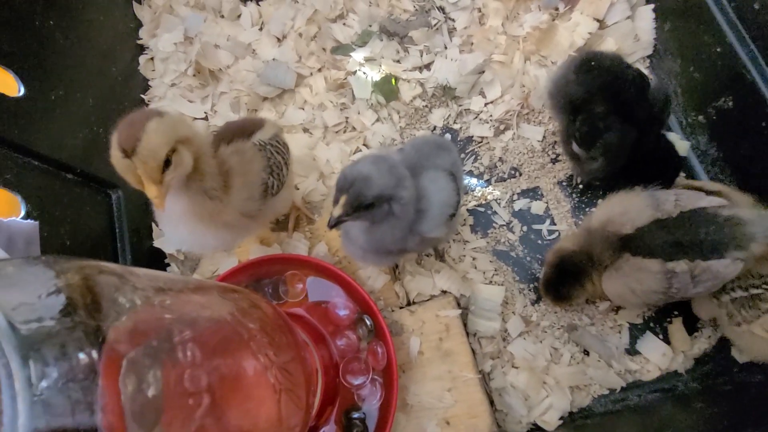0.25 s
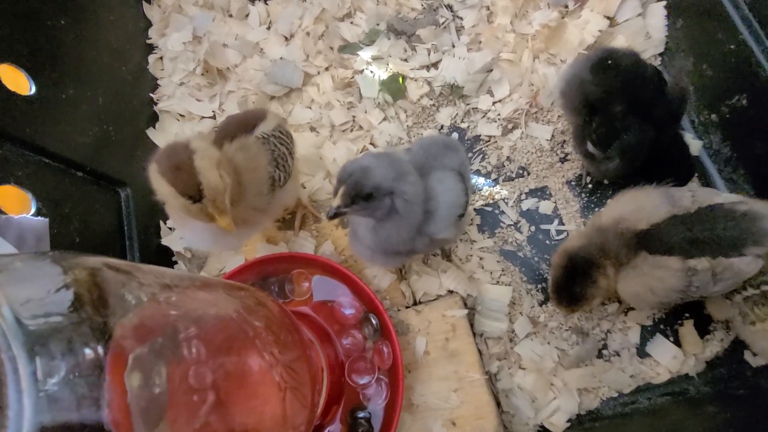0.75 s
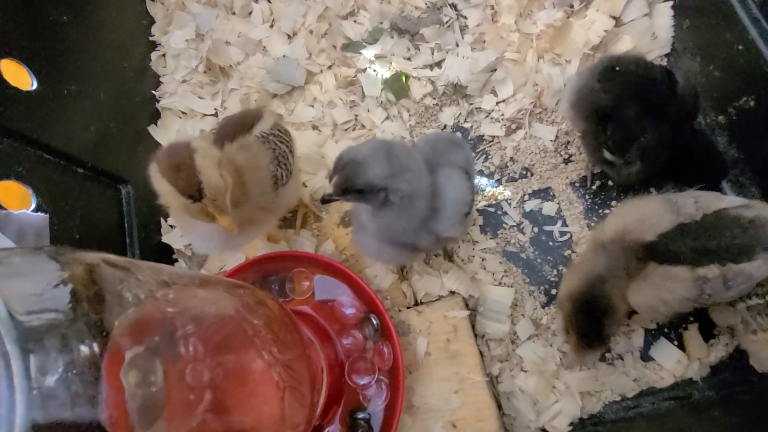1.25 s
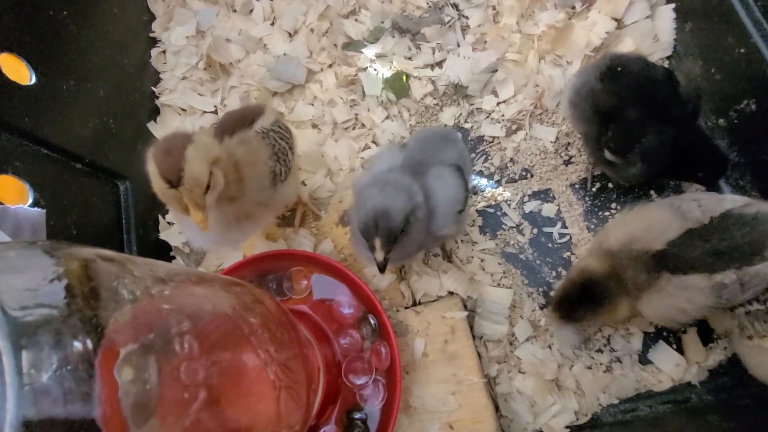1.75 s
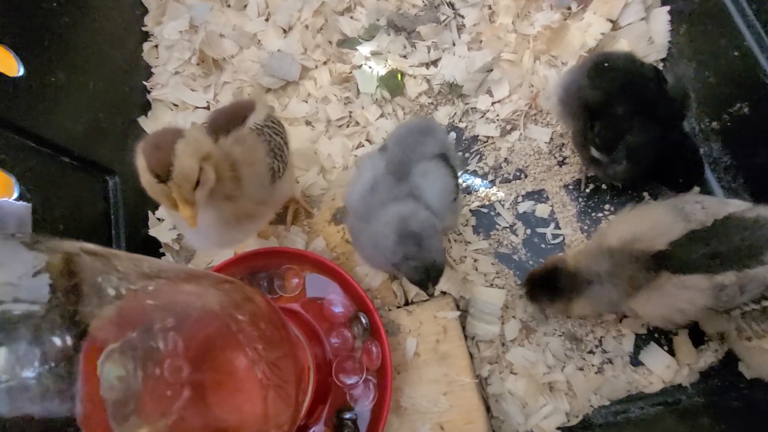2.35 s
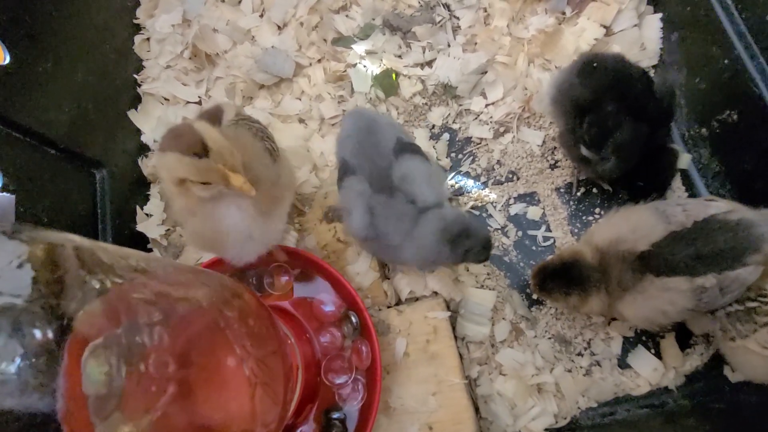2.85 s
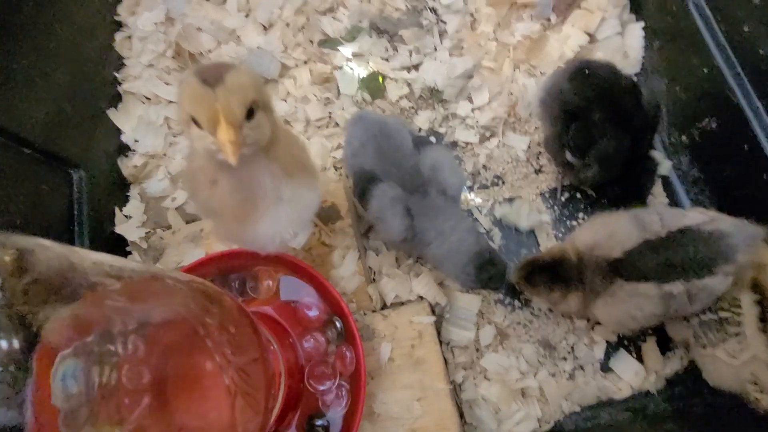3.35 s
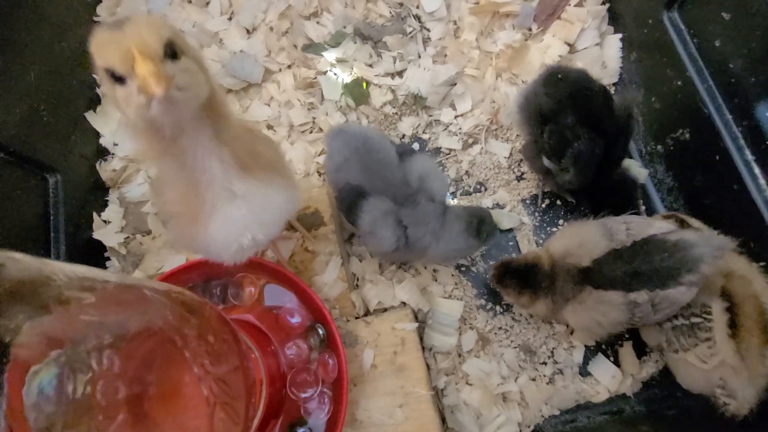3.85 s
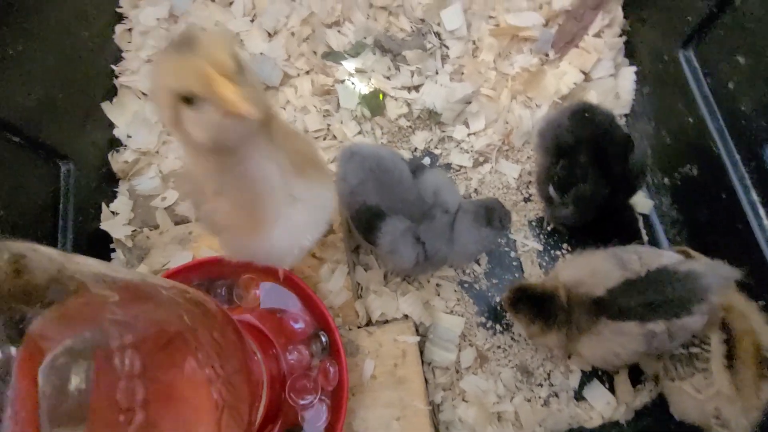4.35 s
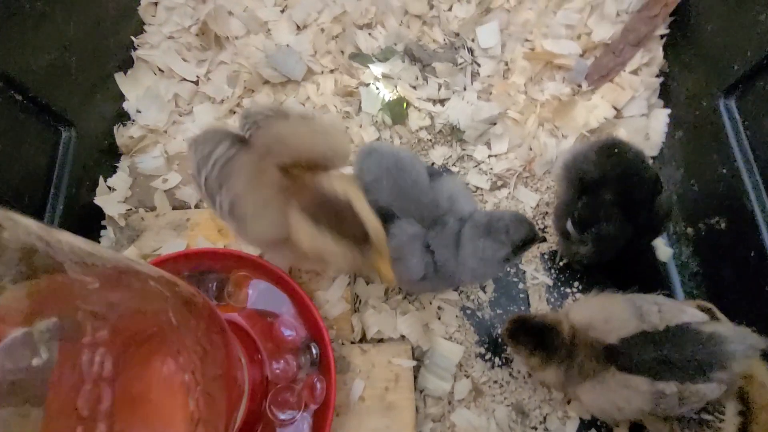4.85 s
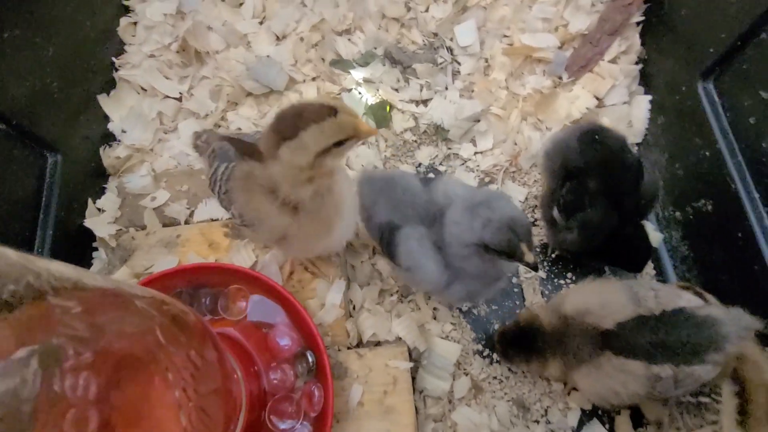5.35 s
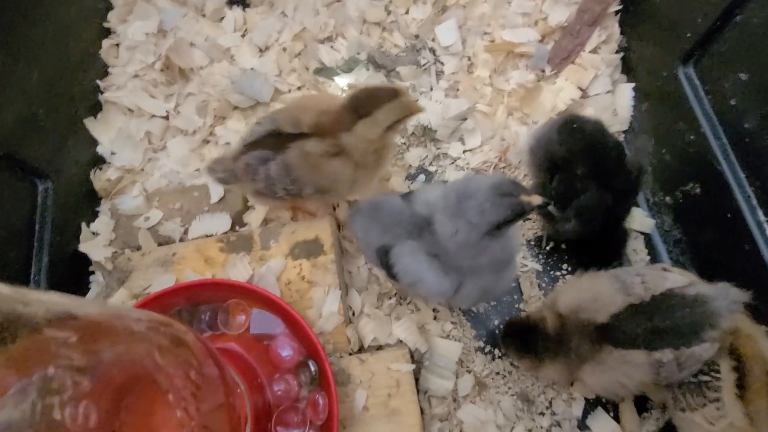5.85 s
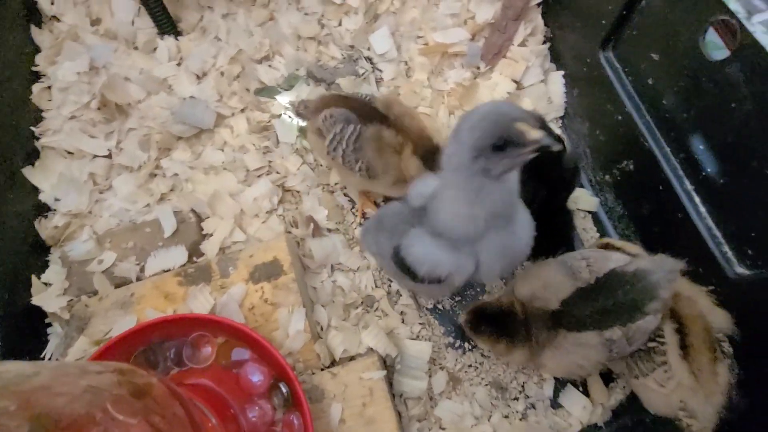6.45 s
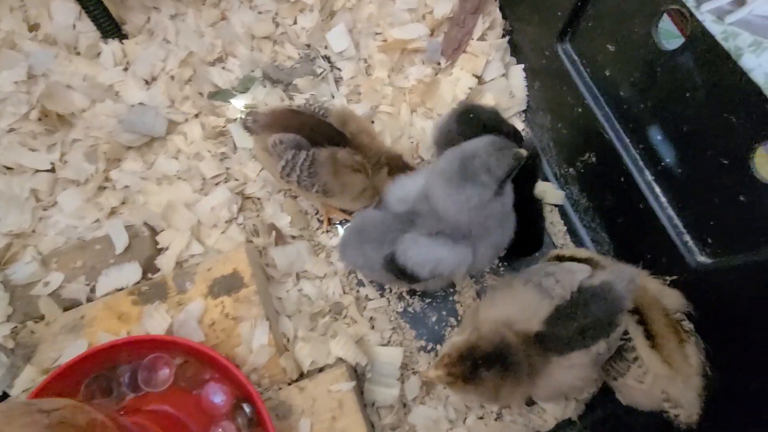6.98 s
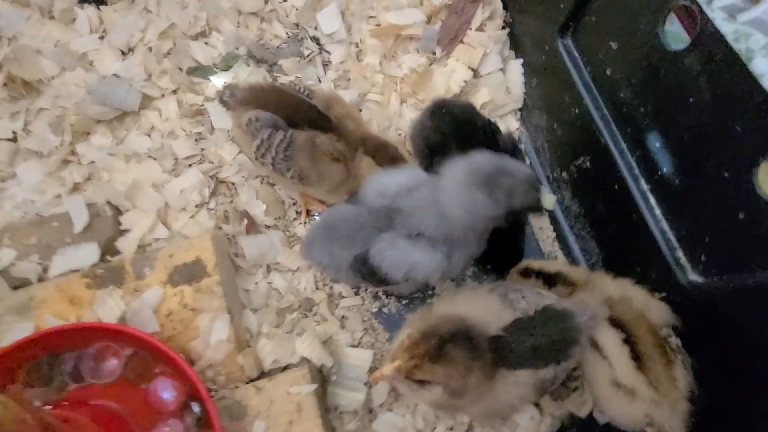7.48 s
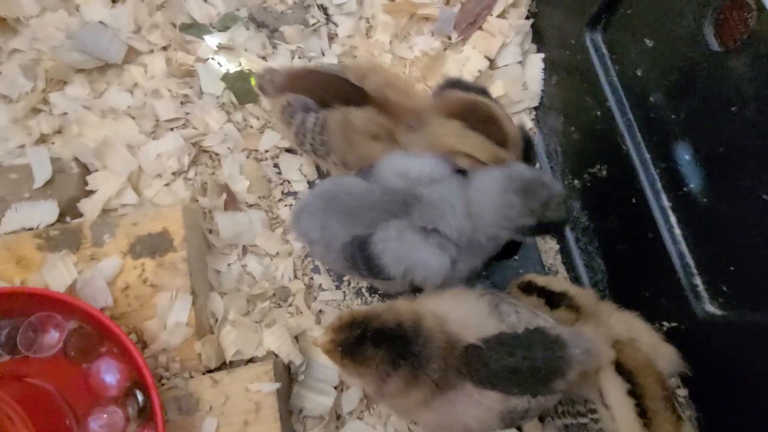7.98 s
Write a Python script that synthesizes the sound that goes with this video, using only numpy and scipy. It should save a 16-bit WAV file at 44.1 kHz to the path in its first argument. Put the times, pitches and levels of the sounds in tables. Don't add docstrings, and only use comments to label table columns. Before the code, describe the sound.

Close up in a plastic bin indoors, young chicks peck through dry wood shavings. Hollow beak taps start lightly, and short pure peeps glide up or down in between. Feet rake the bedding into bright crackles and chips snap. A few loud falling peeps come near the middle, then strong knocks dominate the last two seconds. Low room air, faint fan hum and soft handling bumps lie beneath, with short boxy reflections.

```python
import sys
import numpy as np
from scipy import signal
from scipy.fft import rfft, irfft, next_fast_len
from scipy.io import wavfile
from scipy.ndimage import uniform_filter1d

SR = 44100
rng = np.random.default_rng(int(sys.argv[2]) if len(sys.argv) > 2 else 0)


def gain_from_db(level_db):
    decades = np.asarray(level_db, float) / 20
    return 10 ** decades


def master(y):
    cut = np.clip(np.atleast_2d(y).T, -1, 1)
    pcm = np.round(cut * 32767)
    wavfile.write(sys.argv[1], SR, pcm.astype(np.int16))


N = 362502

# pitch_hz, level_db per Hz
BRIGHT_WOOD = [(2350, -16), (4000, -10.5), (6000, -1), (6470, -1.5), (7230, -2.5), (8450, -15.5),
               (13100, -9), (16000, -12)]
# pitch_hz, level_db per Hz
COARSE_WOOD = [(900, 0), (1500, -8), (2200, 0), (3500, -0.5), (5000, -9), (8000, -57)]
# start_s, peak_db, deep_modes_db, upper_modes_db
KNOCKS = [(0.612, -15, -44, -19.5), (0.984, -11, -26, -20.5), (1.1666, -21.5, -43, -26),
          (1.616, -20.5, -29, -26), (1.633, -24, -24, -28), (1.854, -25.5, -23.5, -51),
          (2.413, -26, -30, -16), (2.4567, -26.5, -23, -27), (2.473, -24.5, -22, -25),
          (3.2428, -23.5, -22, -18), (3.8722, -13, -24, -16), (4.2791, -17, -24, -9.5),
          (5.564, -34.5, -15, -33), (6.0163, -25.5, -26, -17.5), (6.11, -32.5, -8, -38),
          (6.2605, -8.5, -27, -14.5), (6.45, -27, -18, -12), (6.6176, -24.5, -16.5, -23),
          (6.989, -5, -27, -21.5), (7.248, -7.5, -24.5, -23), (7.277, -6, -22.5, -15),
          (7.5213, -7.5, -24, -21), (7.587, -6, -25.5, -26), (7.745, -15, -37, -10), (7.9056, -7, -26, -22)]


def unit_rms(x):
    return x / np.sqrt(np.mean(x ** 2) + 1e-20)


def read_curve(points, hz):
    point_hz, value = np.transpose(points)
    return np.interp(np.log(hz + 1), np.log(point_hz + 1), value)


def coloured(x, points):
    size = next_fast_len(N, True)
    gain = gain_from_db(read_curve(points, np.fft.rfftfreq(size, 1 / SR)))
    return irfft(rfft(x, size) * gain, size)[..., :N]


def place(mix, start_s, sound, pan_db, lag_ms):
    for side, sign in enumerate((1, -1)):
        start = round((start_s + sign * lag_ms / 2000) * SR)
        part = mix[side, start:][:len(sound)]
        part += gain_from_db(sign * pan_db / 2) * sound[:len(part)]


def room_noise():
    # pitch_hz, level_db per Hz
    air_colour = [(12, -34), (30, -9.5), (116, 0.5), (163, -3.5), (216, -0.5), (459, -9), (607, -12),
                  (1220, -15.5), (1610, -24), (3160, -24), (5380, -32.5), (6720, -25), (8890, -53.5),
                  (12100, -36), (16000, -38.5)]
    # pitch_hz, share
    likeness = [(60, 0.55), (240, 1), (950, -0.23), (3770, -0.003), (15000, 0.064)]
    # pitch_hz, width_hz, level_db
    fan_tones = [(125.3, 6.6, -70), (205.5, 7.2, -65)]
    # time_s, level_db
    handling = [
        (0, -71.5),
        (2.4, -63),
        (2.47, -51),
        (2.56, -66),
        (3.18, -74),
        (3.26, -49),
        (3.36, -64.5),
        (6.001, -66),
        (7.5, -60),
        (8.2, -67.5),
    ]
    size = next_fast_len(N, True)
    hz = np.fft.rfftfreq(size, 1 / SR)
    a, b = rfft(rng.standard_normal((2, size)))
    same = np.clip(read_curve(likeness, hz), -1, 1)
    pair = np.array([a, same * a + np.sqrt(1 - same ** 2) * b])
    air = irfft(pair * gain_from_db(read_curve(air_colour, hz)), size)[:, :N]
    out = gain_from_db(-58) * unit_rms(air) * gain_from_db([[-1.1], [1.1]])
    for tone_hz, width_hz, level_db in fan_tones:
        narrow = irfft(a / (1 + (2 * (hz - tone_hz) / width_hz) ** 2), size)
        tone = signal.hilbert(narrow)[:N]
        steadied = (tone / abs(tone) ** 0.6).real
        out = out + gain_from_db(level_db) * unit_rms(steadied)
    bass = np.exp(-((hz - 55) / 30) ** 2)
    rumble = unit_rms(irfft(np.array([b, b + 0.9 * a]) * bass, size)[:, :N])
    return out + rumble * gain_from_db(np.interp(np.arange(N) / SR, *np.transpose(handling)))


def echoes(near, far):
    # pitch_hz, time to fall 60 dB in s
    room_t60 = [(200, 0.18), (700, 0.35), (3000, 0.32), (8000, 0.29)]
    walls_t60 = 0.054
    taps = np.zeros((2, 700, 20))
    spots = rng.integers(20, size=(2, 700, 1))
    np.put_along_axis(taps, spots, rng.choice([-1., 1.], (2, 700, 1)), 2)
    taps = taps.reshape(2, -1) * (np.arange(14000) > 100)
    walls = taps[:, :4000] * gain_from_db(-60 * np.arange(4000) / SR / walls_t60)
    hz, t, z = signal.stft(taps, SR, nperseg=256)
    fade = gain_from_db(-60 * t / read_curve(room_t60, hz)[:, None])
    tail = signal.istft(z * fade, SR, nperseg=256)[1]
    out = 0
    for sound, answer in ((near, walls), (far, tail)):
        mono = sound.mean(0)[None]
        out = out + signal.oaconvolve(mono, answer / np.linalg.norm(answer[0]), axes=1)[:, :N]
    return out


def grains(per_s, spread_db, clump_db, same):
    count = round(per_s * N / SR)
    a, b = clicks = np.zeros((2, N))
    size = gain_from_db(spread_db * np.minimum(rng.exponential(size=(count, 2)), 5))
    size = size * rng.standard_normal((count, 2))
    np.put_along_axis(clicks, rng.integers(N, size=(2, count)), size.T, 1)
    clumps = np.repeat(rng.standard_normal(N // 128 + 1), 128)[:N]
    right = same * np.roll(a, shift=-5) + np.sqrt(1 - same ** 2) * b
    return gain_from_db(clump_db * clumps) * np.array([a, right])


def varied(x):
    z = signal.stft(x, nperseg=128)[2]
    tint = uniform_filter1d(rng.standard_normal(z.shape[1:]), size=9, axis=0)
    tint = unit_rms(uniform_filter1d(tint, size=5, axis=1))
    return signal.istft(z * gain_from_db(4 * tint), nperseg=128)[1][:, :N]


def strokes(rows):
    gain = np.zeros(N)
    for start_s, length_s, level_db in rows:
        gain[round(start_s * SR):round((start_s + length_s) * SR)] += gain_from_db(level_db)
    return uniform_filter1d(gain, size=400)


def scratch():
    # start_s, length_s, bright_db, coarse_db
    rakes = [(0.618, 0.037, -63, -62), (0.665, 0.052, -59.5, -57.5), (0.72, 0.072, -73, -67.5),
             (1.387, 0.021, -55, -48.5), (1.411, 0.041, -68.5, -59), (1.944, 0.031, -62.5, -70),
             (2.451, 0.027, -54.5, -56), (2.581, 0.13, -61.5, -66), (2.677, 0.038, -58.5, -63),
             (2.718, 0.055, -66.5, -73), (2.767, 0.072, -57.5, -80), (2.887, 0.13, -67, -68),
             (3.157, 0.053, -72, -69), (3.263, 0.018, -66, -56.5), (3.295, 0.062, -63.5, -58),
             (3.352, 0.031, -58, -57), (3.382, 0.062, -62.5, -65), (3.562, 0.013, -55, -78),
             (4.03, 0.019, -65, -63.5), (4.494, 0.05, -72, -73), (5.041, 0.054, -54, -55.5),
             (5.087, 0.21, -73, -70.5), (5.425, 0.021, -62, -68), (5.969, 0.11, -59.5, -56),
             (6.089, 0.054, -64.5, -71), (6.16, 0.075, -66, -68), (6.513, 0.061, -82, -70),
             (7.3, 0.057, -72, -56), (7.59, 0.077, -68.5, -61.5), (7.683, 0.031, -62, -61.5),
             (6.222, 0.37, -83, -74), (6.607, 0.14, -81.5, -73), (5.537, 0.093, -82, -76),
             (7.932, 0.11, -84, -72)]
    # start_s, bright_db, coarse_db
    flicks = [(1.452, -65, -79), (1.900, -80, -83), (3.052, -73.5, -74), (3.085, -81, -76),
              (3.174, -68, -70), (3.196, -69, -73), (3.238, -72, -61), (3.608, -67, -67),
              (4.138, -61, -59.5), (4.280, -74, -67), (5.224, -63, -63), (5.459, -66, -58),
              (5.775, -65.5, -68), (6.269, -61, -61), (6.398, -67, -79), (6.632, -72, -78),
              (7.285, -62.5, -62), (7.522, -75, -66), (7.92, -62.5, -56), (1.178, -67, -59),
              (1.196, -76, -68), (0.780, -68.5, -70), (4.972, -72, -72), (1.230, -87, -66)]
    # start_s, length_s, level_db
    drags = [
        (2.45, 0.041, -48),
        (2.6, 0.43, -65.5),
        (3.31, 0.14, -52.5),
        (5.43, 0.083, -54),
        (5.975, 0.053, -49.5),
        (6.19, 0.065, -60),
        (6.49, 0.091, -55.5),
        (6.63, 0.11, -67),
    ]
    # pitch_hz, level_db per Hz
    floor_colour = [(300, -28.5), (550, -3), (750, 5), (930, -15), (1150, 1.5), (1450, -12.5),
                    (2500, -32.5)]
    rows = list(rakes)
    for start_s, peak_db, *_ in KNOCKS:
        toss_db = 2.16 * peak_db
        rows.append((start_s + 0.002, 0.025, toss_db - 53.5, toss_db - 41.5))
    for start_s, bright_db, coarse_db in flicks:
        rows.append((start_s, 0.015, bright_db, coarse_db))
    rows = np.array(rows)
    steps = rng.standard_normal(N // 600 + 1).clip(-2, 1.5)
    settling = gain_from_db(4 * np.repeat(steps, 600)[:N] - 92)
    wood = varied(grains(14000, 2.6, 1.0, 0.5))
    bright = gain_from_db(5) * unit_rms(coloured(wood, BRIGHT_WOOD)) * (strokes(rows[:, :3]) + settling)
    coarse = gain_from_db(3.5) * unit_rms(coloured(wood, COARSE_WOOD)) * strokes(rows[:, [0, 1, 3]])
    dull = unit_rms(coloured(grains(1100, 3.0, 2.5, 0.85), floor_colour))
    dull = dull * (gain_from_db(-71) + strokes(drags))
    return (bright + coarse) * gain_from_db([[-0.3], [0.3]]) + dull * gain_from_db([[-2.5], [2.5]])


def snaps():
    # start_s, peak_db, coarse_part_db
    shavings = [(0.13, -64, 1), (0.3266, -68, 19), (0.6244, -52, -2), (0.634, -37.5, -13),
                (0.651, -33, -20), (0.746, -43, -18), (1.1669, -46, 13), (1.391, -40, -3),
                (1.5065, -51, -20), (1.517, -45, -1), (1.6727, -35, -6), (1.718, -54, -15),
                (1.8582, -37.5, -3), (1.941, -52, -17), (2.282, -60.5, 2), (2.4563, -44, -4),
                (2.491, -26, -19), (2.592, -54, 9), (2.6946, -38.5, -25), (2.756, -47, -4),
                (2.7764, -50, -2), (2.83, -43, -13), (3.275, -51, -5), (3.3617, -37.5, -5),
                (3.3714, -34.5, -4), (3.3848, -38, -11), (3.415, -45, -12), (3.549, -47, -18),
                (3.566, -52, -20), (3.6214, -34, -42), (3.701, -63, -4), (3.7894, -60, -1),
                (4.0247, -43, -9), (4.0348, -39, -3), (4.1155, -51, -6), (4.1326, -42, -14),
                (4.145, -39.5, -5), (4.226, -47, -15), (4.2652, -50, -5), (4.439, -45, -23),
                (4.514, -52, -11), (4.5399, -46.5, 8.5), (4.804, -51.5, 1), (4.985, -45.5, -21),
                (5.0526, -43, -9), (5.3732, -48, -19), (5.4325, -49.5, -17), (5.976, -52, 4),
                (6.1702, -41, -8), (6.2127, -52, -14), (6.23, -42.5, -26), (6.5223, -43, -7),
                (6.545, -42, -1.5), (7.584, -45, -3), (7.686, -59, -9), (7.7007, -46, -12),
                (7.7463, -34, -8), (7.805, -52, -4), (7.991, -54, -3), (8.086, -60, 2)]
    # start_s, peak_db, coarse_part_db, airy_part_db
    splinters = [(1.470, -60, -20, 8), (1.550, -61, -20, 8), (1.636, -57, -3, -14), (1.953, -54, -3, -11),
                 (1.968, -61, -15, 0), (2.637, -50, -12, 2), (2.894, -50, -16, -2), (2.933, -50, -12, 6),
                 (3.324, -41, -9, -4), (3.492, -56, -6, -17), (3.867, -60, -9, -5), (4.326, -61, -14, -12),
                 (4.386, -57, -8, -10), (4.906, -60, -14, 1), (5.083, -40, -8, -13), (5.486, -50, -14, -11),
                 (5.566, -55.5, 15.5, -21), (5.584, -62, 13, -12), (5.620, -60, -5, -13),
                 (6.113, -57, 17, -12), (6.329, -56, -13, 12), (6.447, -58.5, 18, -17),
                 (6.497, -58, -10, 7), (6.570, -51, -15, 12), (6.652, -58, -15, -8), (6.693, -53, -12, -3),
                 (6.712, -70, -15, 1), (6.758, -68, -14, 0), (7.659, -58, -17, 3), (7.734, -45, -15, -8),
                 (7.886, -52, -16, -11), (8.003, -65, -13, -12), (8.027, -66, -8, 1)]
    # pitch_hz, level_db per Hz
    airy_colour = [(6000, -27), (8500, -21), (11000, -16), (15000, -16), (16500, -17)]
    rise_s, t60 = 0.003, 0.015
    parts, t = np.zeros((3, 2, N)), np.arange(1024) / SR
    slope_s = np.where(t < rise_s, 3.9 * rise_s, t60)
    shape_db = -60 * abs(t - rise_s) / slope_s
    for start_s, peak_db, *shares_db in [(*row, -30) for row in shavings] + splinters:
        side = rng.uniform(-0.64, 1)
        burst = gain_from_db(peak_db + 5 + shape_db) * rng.standard_normal(len(t))
        for part, share_db in zip(parts, (0, *shares_db)):
            place(part, start_s - 0.91 * rise_s, gain_from_db(share_db) * burst, 3 * side, -0.15 * side)
    colours = BRIGHT_WOOD, COARSE_WOOD, airy_colour
    return sum(coloured(part, colour) for part, colour in zip(parts, colours))


def rising(low_s, hold_s, low_hz, top_hz, level_db, sag):
    drop_speed, roll_over = 1.8, 0.73
    sweep_s = 0.0082 + (top_hz - low_hz) / 52300
    t = np.arange(-hold_s, sweep_s * (1 + roll_over / drop_speed), 1 / SR)
    before = np.minimum(t, 0)
    up = np.clip(t / sweep_s, 0, 1)
    down = drop_speed * np.maximum(t / sweep_s - 1, 0)
    hz = low_hz + sag * before ** 2 + (top_hz - low_hz) * np.sin(np.pi / 2 * (up + down)) ** 2
    effort_db = -18 * (before / hold_s) ** 2 - 17.5 * down / roll_over
    return low_s - hold_s, hz, level_db + effort_db


def sliding(start_s, length_s, first_hz, last_hz, level_db, habit):
    peak, bend = habit
    part = np.linspace(0, 1, round(length_s * SR))
    hz = last_hz + (first_hz - last_hz) * (1 - part) ** bend
    return start_s, hz, level_db + np.interp(part, [0, peak, 1], [-18, 0, -15.5])


def peeps():
    # lowest_point_s, hold_before_s, low_hz, top_hz, level_db
    level_chick = [
        (.151, 0.016, 3057, 3860, -37),
        (.329, 0.016, 3335, 3870, -37),
        (1.001, 0.025, 3143, 3800, -41.5),
        (7.374, .023, 2796, 4490, -29),
    ]
    sagging_chick = [
        (0.76, 0.032, 2550, 3750, -38.5),
        (0.966, 0.03, 3000, 4050, -44),
        (2.798, 0.033, 2856, 4010, -37),
    ]
    swooping_chick = [
        (7.524, 0.021, 3182, 4530, -29),
        (7.755, 0.031, 3360, 4560, -30),
    ]
    reedy_chick = [
        (1.573, 0.028, 2707, 3750, -36.5),
        (1.832, 0.04, 3080, 3520, -47),
    ]
    level_reedy_chick = [
        (2.206, 0.022, 3096, 3640, -46),
    ]
    central_chick = [
        (4.128, .015, 2932, 3850, -41.5),
        (4.43, 0.0066, 2960, 3460, -51.5),
        (6.203, 0.018, 2887, 3510, -42.5),
    ]
    # start_s, length_s, first_hz, last_hz, level_db
    falling_chick = [
        (3.419, 0.037, 3540, 2510, -27.5),
        (3.724, 0.03, 3600, 2620, -36),
    ]
    hooking_chick = [
        (3.553, 0.036, 3960, 2654, -29),
    ]
    far_chick = [
        (3.17, 0.019, 3300, 2820, -54),
        (3.268, 0.022, 3240, 2800, -51),
        (4.503, 0.017, 3500, 3130, -56),
        (5.694, 0.034, 3150, 2610, -44.5),
        (6.584, 0.048, 3250, 2675, -42),
        (6.806, 0.046, 3280, 2684, -40.5),
    ]
    sliding_chick = [
        (3.893, 0.038, 2720, 3340, -41.5),
        (7.708, 0.052, 2950, 3700, -56.5),
        (8.207, 0.043, 3600, 2794, -51.5),
    ]
    # left_minus_right_db, left_lag_ms, overtone_db, sag into the low point in Hz per s squared
    riser_voices = [
        (-4, 0.21, -31, 20000),
        (-8, 0.08, -27, 240000),
        (-8, 0.18, -34, 1100000),
        (-10.5, .01, -19, 494000),
        (-12.5, .01, -16, 140000),
        (0, -0.1, -30, 30000),
    ]
    slider_voices = [
        (8.5, -0.19, -25.5, (0.6, 1.21)),
        (7, -0.23, -22, (0.75, 1.83)),
        (0, -0.12, -50, (0.47, 1.8)),
        (-14.5, .05, -27, (0.24, 0.95)),
    ]
    # pitch_hz, level_db
    throat = [(2500, 0), (2800, -4.5), (3150, 0.5), (3400, -5), (3680, -15.5), (4000, -12), (4500, -25.5)]
    risers = level_chick, sagging_chick, swooping_chick, reedy_chick, level_reedy_chick, central_chick
    sliders = falling_chick, hooking_chick, far_chick, sliding_chick
    chicks = [(calls, rising) for calls in risers] + [(calls, sliding) for calls in sliders]
    out = np.zeros((2, N))
    for (calls, glide), voice in zip(chicks, riser_voices + slider_voices):
        pan_db, lag_ms, overtone_db, habit = voice
        for call in calls:
            start_s, hz, effort_db = glide(*call, habit)
            level_db = uniform_filter1d(effort_db + read_curve(throat, hz), size=100, mode="nearest")
            pitch = uniform_filter1d(hz, size=180, mode="nearest")
            phase = 2 * np.pi * np.cumsum(pitch) / SR
            lift_db = overtone_db - 8 * ((pitch - 3140) / 370) ** 2
            tone = np.sin(phase) + gain_from_db(lift_db) * np.sin(2 * phase)
            flutter = uniform_filter1d(rng.standard_normal(4000), size=120)
            flutter = unit_rms(uniform_filter1d(flutter, size=120))[:len(hz)]
            level = gain_from_db(level_db + 5.5 + 1.05 * flutter)
            fade = signal.windows.tukey(len(hz), 0.2)
            place(out, start_s, np.sqrt(2) * tone * level * fade, pan_db, lag_ms)
    return out


def ring(modes, detune, t):
    hz, level_db, t60 = np.transpose(modes)[:, :, None]
    level_db = level_db + 2.5 * rng.standard_normal(level_db.shape)
    tones = np.sin(2 * np.pi * hz * detune[:len(hz), None] * t)
    x = (gain_from_db(level_db - 60 * t / t60) * tones).sum(0)
    return x / abs(x).max()


def pecks():
    # start_s, peak_db, upper_modes_db, tick_db
    taps = [(0.0504, -26, -22, -29), (0.0925, -22, -17.5, -29), (0.368, -19.5, -13.5, -35),
            (2.073, -27, -16.5, -23), (5.767, -22, -21, -30), (0.513, -24, -2, -26.5), (1.389, -44, 7, -31),
            (2.282, -37.5, -3, -30), (2.488, -22.5, -1.5, -26.5), (2.694, -39, -3, -29),
            (3.146, -35.5, 2, -33), (3.323, -31.5, -2, -42), (3.349, -34, -12, -31),
            (3.363, -27.5, -9, -32), (3.412, -48, 2, -26), (4.026, -39.5, -8, -26),
            (4.154, -40.5, -15, -38), (4.226, -42, -7, -36), (4.539, -43.5, 14, -5), (4.693, -40, -12, -32),
            (4.737, -44, -1, -32), (4.774, -40.5, -12, -24), (5.425, -36, 1, -39), (5.977, -39.5, 3, -31),
            (6.199, -37, 4, -37.5), (6.223, -37, 5, -35), (6.518, -41.5, 17, -33), (6.634, -30, -7, -31),
            (6.69, -43.5, 14, -32), (8.165, -45, 1, -28), (3.308, -42, 0, -36), (3.37, -37, -17, -31),
            (3.386, -53, 0, -32), (2.777, -42, -11, -35), (1.954, -43, 3, -29), (2.096, -40, -23, -38),
            (6.843, -43.5, -8, -19.5), (6.495, -41, 16, -36), (6.67, -41, 15, -27)]
    # pitch_hz, level_db, time to fall 60 dB in s
    deep_modes = [(207, -11, .07), (378, 0, .05)]
    body_modes = [(565, 0, .042), (640, -2, .03), (760, -7, .025)]
    upper_modes = [(1152, 11, 0.02), (1216, -5, 0.048), (1330, -11, 0.045), (1560, -3, 0.01),
                   (2120, -1, 0.011)]
    # pitch_hz, level_db, time to fall 60 dB in s
    slap_modes = [(680, 0, 0.015), (1055, -13.5, 0.014)]
    lead_s, lead_db = 0.00523, -25
    blows = [(*row, -48 - 0.5 * row[1]) for row in KNOCKS]
    for start_s, peak_db, upper_db, tick_db in taps:
        blows.append((start_s, peak_db, -25.5, upper_db, tick_db))
    out, t = np.zeros((2, N)), np.arange(3000) / SR
    body, deep, upper = 1 + 0.025 * rng.standard_normal((len(blows), 5, 3)).transpose(2, 0, 1)
    give = (1 - np.exp(-t / 0.001)) ** 2
    beak = signal.butter(1, [1250, 1680], "bandpass", fs=SR, output="sos")
    glint = signal.butter(2, [1500, 3000], "bandpass", fs=SR, output="sos")
    for k, (start_s, peak_db, deep_db, upper_db, tick_db) in enumerate(blows):
        floor = ring(body_modes, body[k], t)
        floor = floor + gain_from_db(16 + 2.02 * peak_db) * ring(slap_modes, deep[k, 2:], t)
        floor = give * (floor + gain_from_db(upper_db + 6) * ring(upper_modes, upper[k], t))
        floor = floor / abs(floor).max()
        hiss = rng.standard_normal(len(t))
        tick = signal.sosfilt(beak, hiss * gain_from_db(-60 * t / 0.038))
        tick = tick + signal.sosfilt(glint, hiss * gain_from_db(1 - 60 * t / 0.014))
        place(out, start_s + 0.0016, gain_from_db(peak_db + 1.08) * (gain_from_db(tick_db + 18) * tick + floor), -6.8, 0.2)
        place(out, start_s - lead_s, gain_from_db(peak_db + lead_db) * floor, -6.2, 0.19)
        place(out, start_s - lead_s / 2, gain_from_db(peak_db + lead_db - 1) * floor, -6.2, 0.19)
        bass = give * ring(deep_modes, deep[k], t)
        place(out, start_s + 0.0021, gain_from_db(peak_db + deep_db + 20) * bass, 0.6, 0.05)
    out = signal.lfilter(*signal.iirnotch(475, 4.0, fs=SR), out)
    out = signal.lfilter(*signal.iirnotch(262, 2.5, fs=SR), out)
    return signal.sosfilt(signal.butter(2, 170, "highpass", fs=SR, output="sos"), out)


def scene():
    calls, knocks, bedding = peeps(), pecks(), scratch() + snaps()
    near = gain_from_db(-3.5) * calls + gain_from_db(-14.5) * knocks + gain_from_db(-8) * bedding
    far = gain_from_db(-19.5) * calls + gain_from_db(-19.5) * knocks + gain_from_db(-14.5) * bedding
    return calls + knocks + bedding + echoes(near, far) + room_noise()


def low_pass(x):
    return signal.sosfilt(signal.butter(12, 16480, fs=SR, output="sos"), x)


def record(dry):
    edge = signal.ellip(8, 0.1, 60, 15950, fs=SR, output="sos")
    mix = signal.sosfilt(edge, dry)
    return low_pass(mix)


dry = scene()
out = record(dry)
master(out)
```